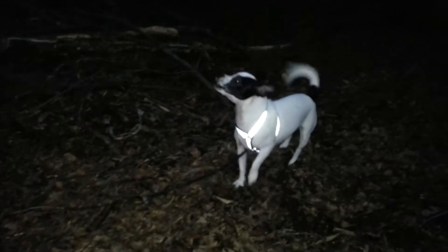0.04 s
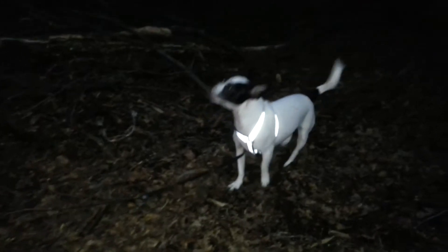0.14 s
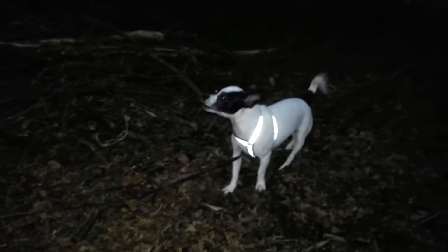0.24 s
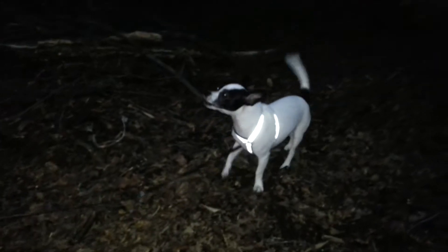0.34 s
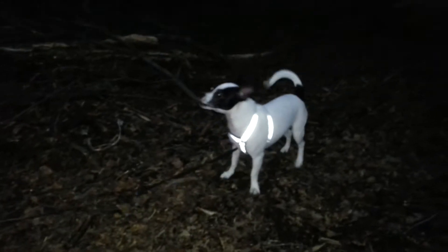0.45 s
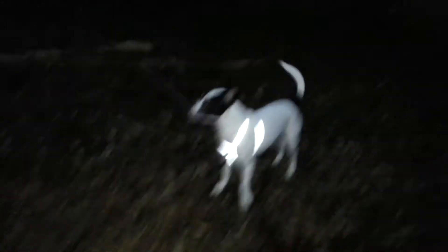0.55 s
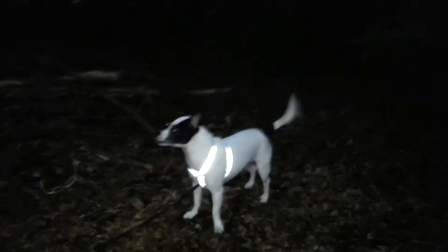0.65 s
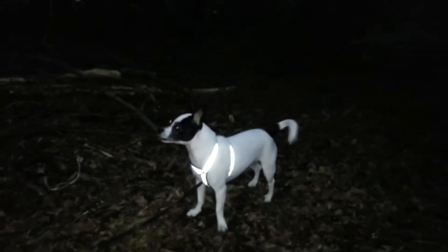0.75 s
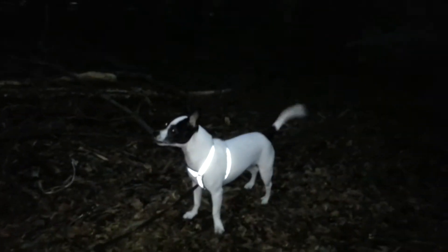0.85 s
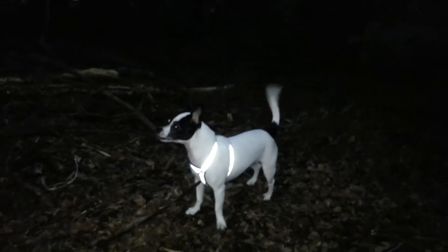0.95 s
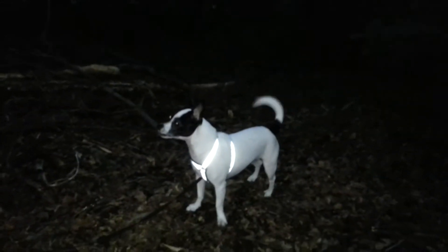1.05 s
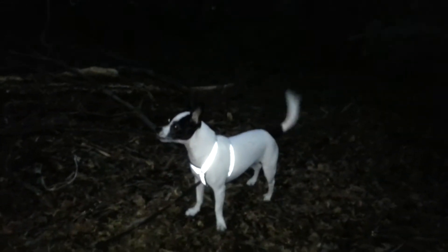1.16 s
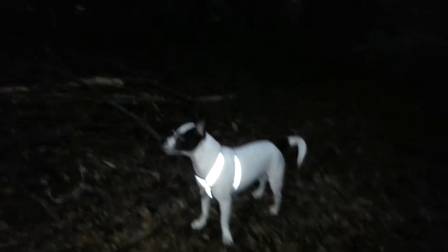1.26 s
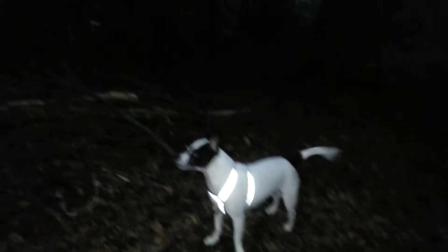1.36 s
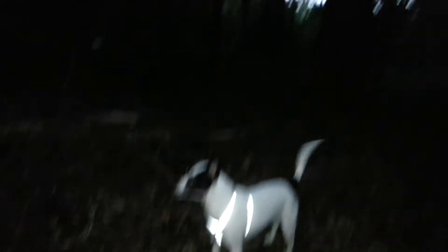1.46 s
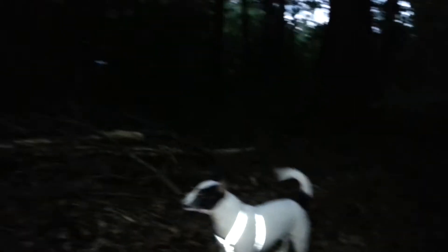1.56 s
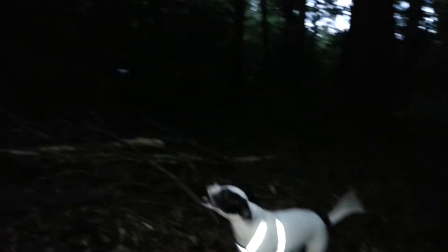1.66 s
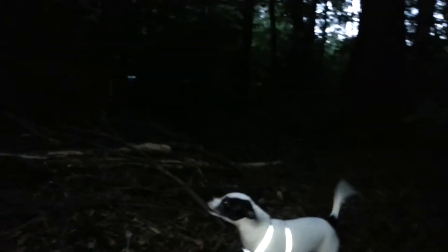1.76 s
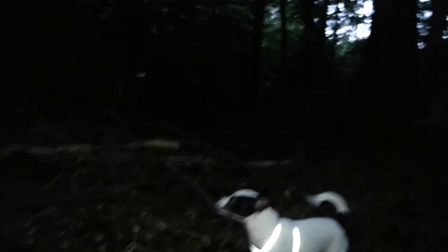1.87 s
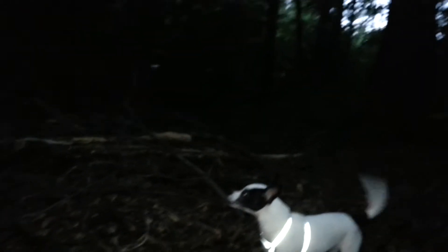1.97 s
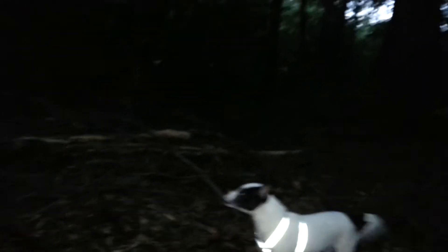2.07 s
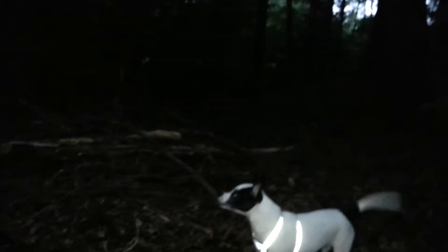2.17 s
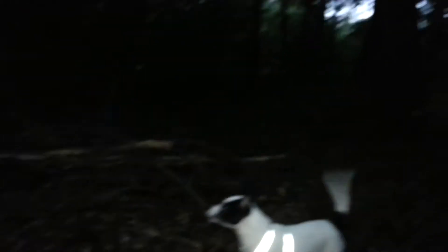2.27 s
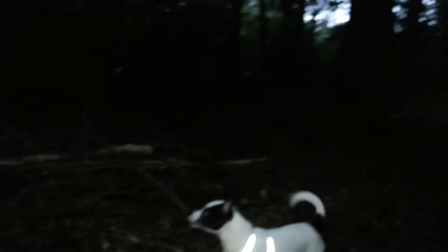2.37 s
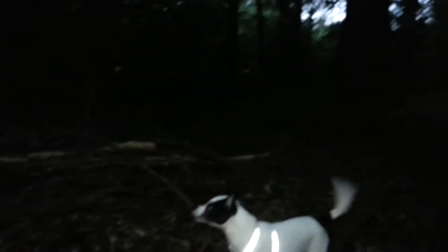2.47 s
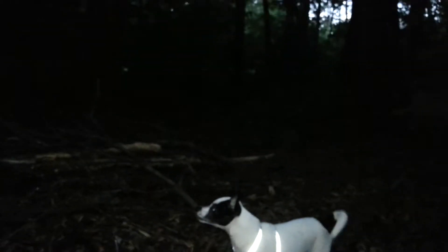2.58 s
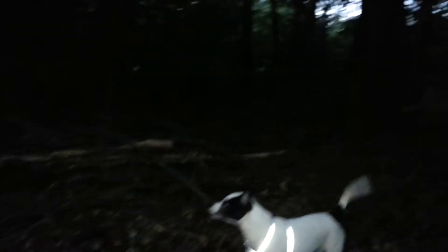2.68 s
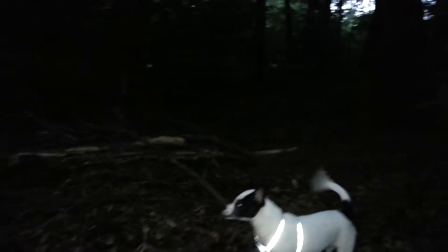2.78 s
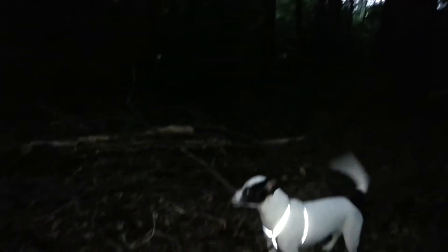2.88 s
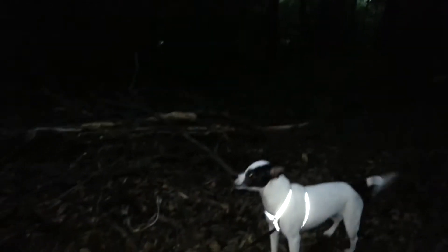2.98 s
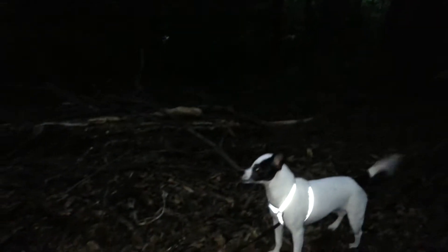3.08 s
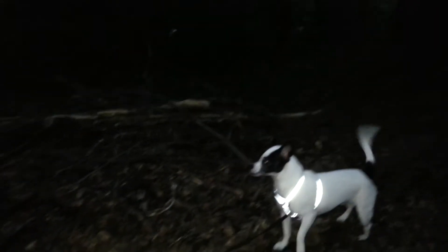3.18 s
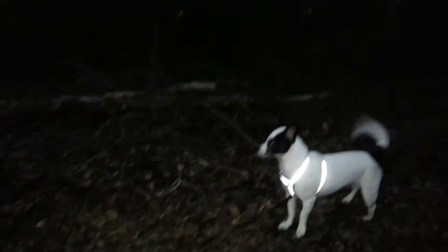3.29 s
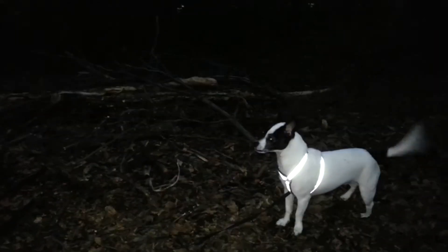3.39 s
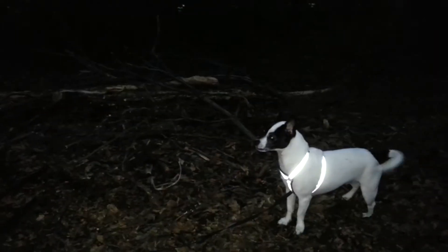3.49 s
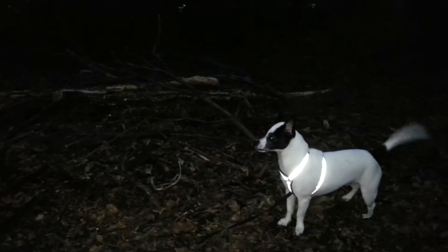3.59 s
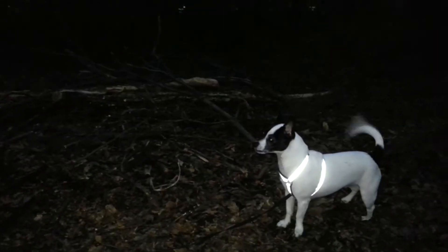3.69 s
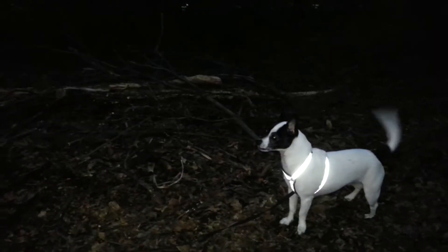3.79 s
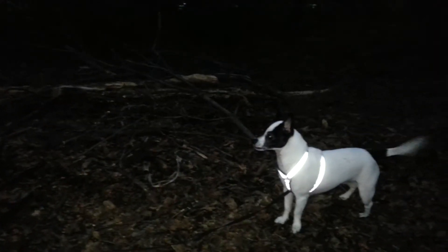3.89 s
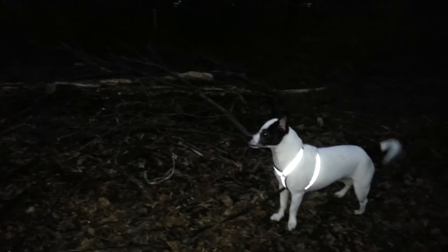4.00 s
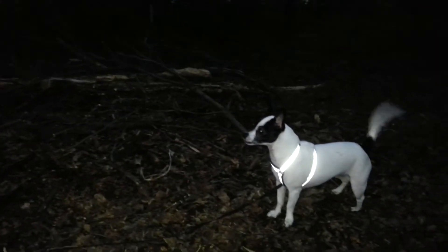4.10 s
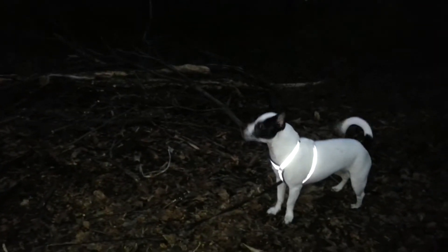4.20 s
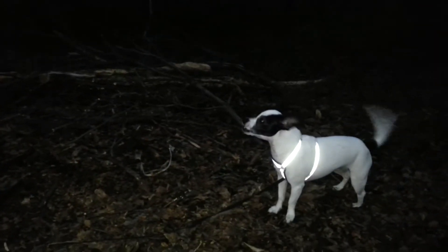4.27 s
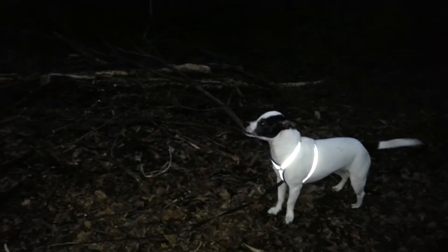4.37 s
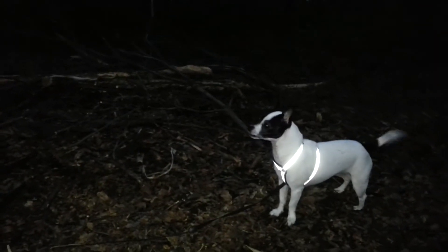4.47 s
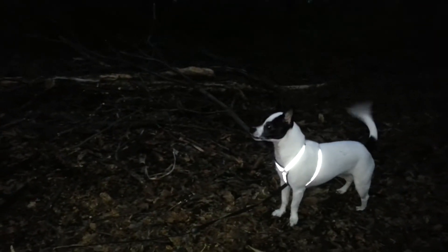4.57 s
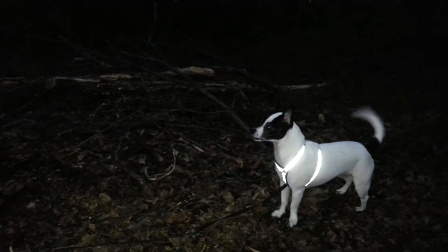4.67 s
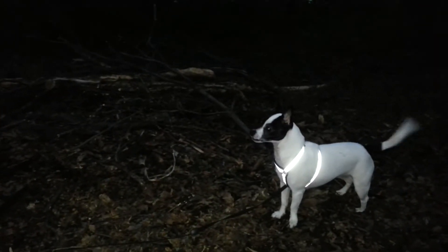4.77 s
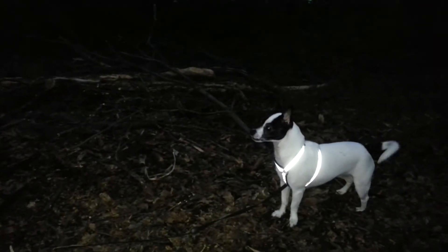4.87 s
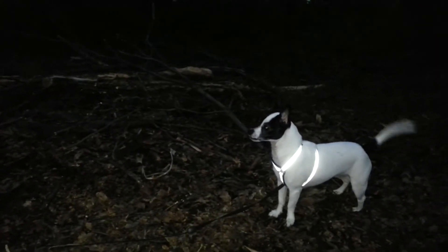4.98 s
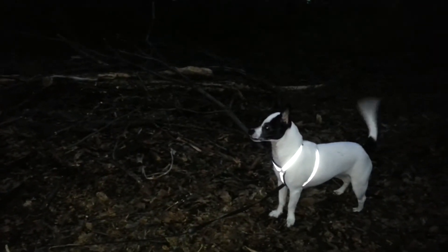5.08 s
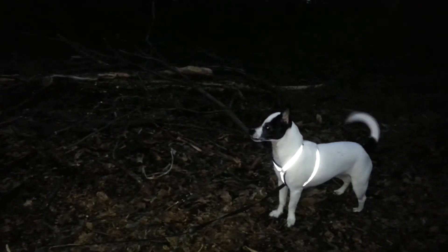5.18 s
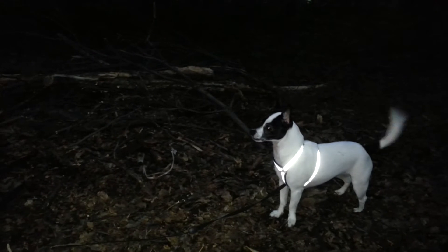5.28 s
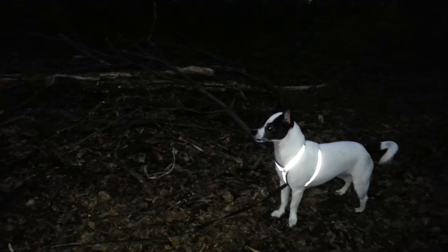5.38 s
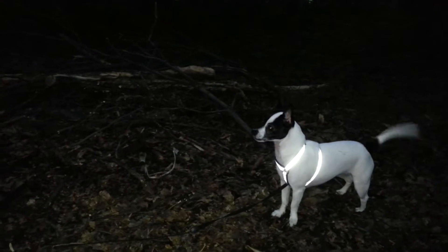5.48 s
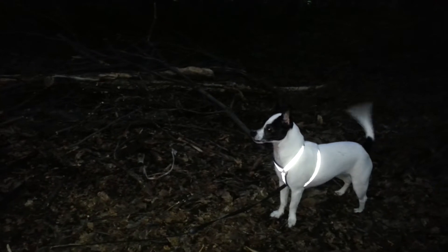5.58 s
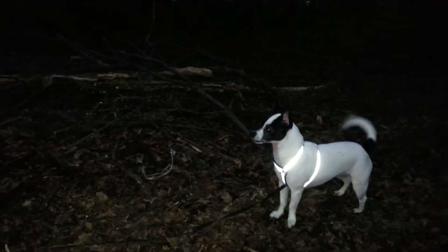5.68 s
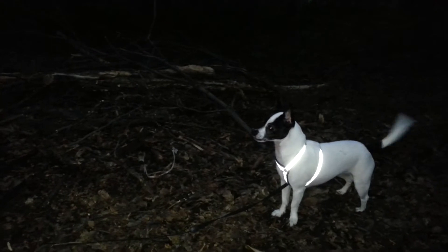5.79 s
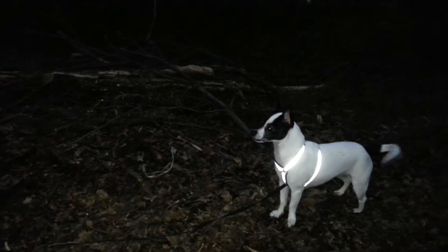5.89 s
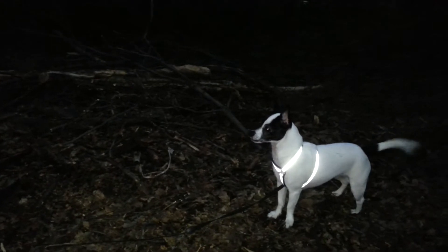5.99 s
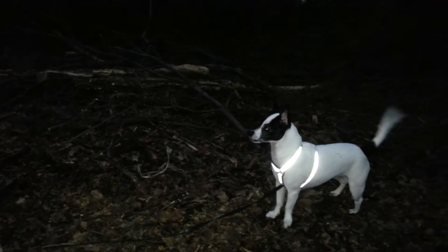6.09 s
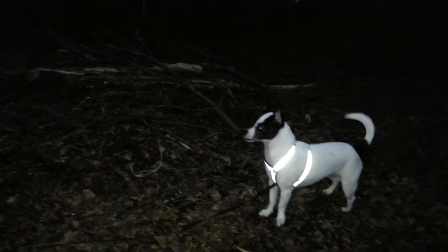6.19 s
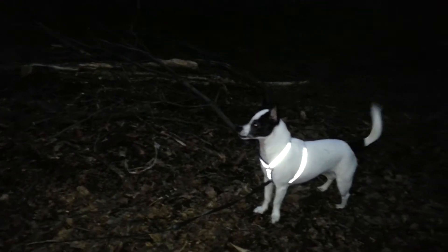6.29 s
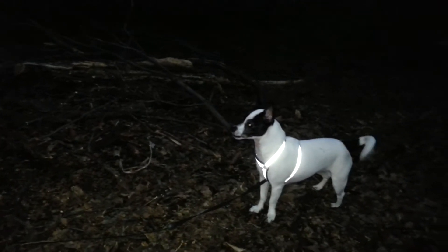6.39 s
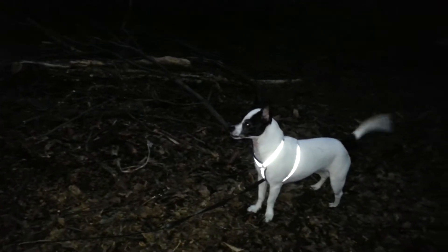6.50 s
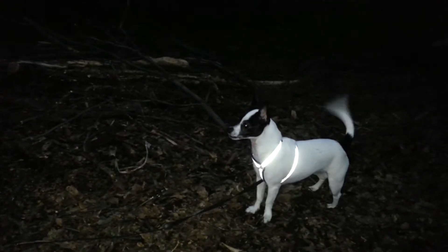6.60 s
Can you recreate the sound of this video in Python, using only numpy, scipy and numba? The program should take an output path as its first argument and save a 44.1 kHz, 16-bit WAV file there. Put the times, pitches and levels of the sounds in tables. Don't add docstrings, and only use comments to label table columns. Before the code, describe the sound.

Throbbing growl, low woof, loud overloaded bark, then woof and bark again from a nearby small dog; drops tick on leaves, far dog yelps faintly.

```python
import sys
import numpy as np
from scipy import signal
from scipy.fft import rfft, irfft, next_fast_len
from scipy.io import wavfile
from scipy.ndimage import uniform_filter1d, map_coordinates
from numba import njit

SR = 44100
rng = np.random.default_rng(int(sys.argv[2]) if len(sys.argv) > 2 else 0)


def volts_from_db(level):
    exponent = np.asarray(level, float) / 20
    return 10 ** exponent


def wrap_up_sound(samples):
    columns = np.atleast_2d(samples).T
    tamed = np.clip(columns, -1, 1)
    steps = np.round(tamed * 32767).astype(np.int16)
    wavfile.write(sys.argv[1], SR, steps)


N = 293265


def unit(x):
    return x / np.sqrt(np.mean(x ** 2) + 1e-20)


def along(points, hz):
    f, v = np.transpose(points)
    return np.interp(np.log(hz + 1), np.log(f + 1), v)


def span(rows):
    s, *cols = np.transpose(rows)
    start = round(s[0] * SR)
    t = np.arange(start, min(round(s[-1] * SR), N)) / SR
    return start, [np.interp(t, s, c) for c in cols]


def wobble(size, rate):
    knots = rng.standard_normal(int(size * rate / SR) + 4)
    return map_coordinates(knots, [np.arange(size) * rate / SR])


def filtered(x, response):
    m = next_fast_len(N + SR // 2)
    return irfft(rfft(x, m) * response(np.fft.rfftfreq(m, 1 / SR)), m)[..., :N]


def band(hz, low_hz, high_hz):
    up, down = 1j * hz / low_hz, 1j * hz / high_hz
    return up ** 2 / (1 + np.sqrt(2) * up + up ** 2) / (1 + np.sqrt(2) * down + down ** 2)


@njit
def resonate(x, turn, radius):
    y = np.zeros(len(x))
    for n in range(2, len(x)):
        push = (1 - radius ** 2) / 2 * (x[n] - x[n - 2])
        y[n] = push + 2 * radius * np.cos(turn[n]) * y[n - 1] - radius ** 2 * y[n - 2]
    return y


def throat(x, modes, stretch, bright_db=0, tongue=None):
    out = 0
    for k, (hz, width, db) in enumerate(modes):
        if tongue is not None and 1440 < hz < 2050:
            shift = tongue
        else:
            shift = stretch ** (1 if hz < 1000 else 1 / 2 if hz < 2050 else 1 / 4)
        turn, radius = 2 * np.pi * hz * shift / SR, np.exp(-np.pi * width / SR)
        twice = resonate(resonate(x, turn, radius), turn, radius)
        level = volts_from_db(db + bright_db * np.clip(hz / 1200 - .75, 0, 1))
        out = out + (-1) ** k * level * twice
    return out


# resonances (centre in Hz, width in Hz, level in dB),
# then the level of the breath hiss under the voice in dB.
MOUTHS = [
    ([(211, 81, -12.5), (417, 170, -16.5), (700, 160, 5), (1150, 240, -10), (1913, 180, -9.5)], -44.5),
    ([(839, 250, 9), (1550, 360, 2), (2274, 200, 0.5), (3600, 5100, -23)], -38.5),
    ([(246.9, 96, -16.5), (750, 260, -5.5), (1376, 180, -7), (1898, 210, -11)], -29),
    ([(742, 210, 7), (1521, 300, 0.9), (2193, 230, -5), (3700, 1400, -27), (3980, 600, -25.5)], -32.5),
]
# time in seconds, pitch in Hz, effort in dB, mouth stretch as a factor,
# tongue shift of the middle resonance as a factor.
WOOF_1 = [(.364, 214.6, -36.5, 0.84, 1.3), (.371, 217.3, -20.5, 1.05, 0.77), (.383, 211.1, -16, 0.89, 0.87),
          (.388, 186.2, -11, 1.11, 1.02), (.397, 186, -21.5, 0.93, 1.02), (.436, 170.3, -19, 1.06, 0.9),
          (.45, 173, -31, 1.1, 0.99)]
BARK_1 = [(1.598, 281, -36.5, 0.31, 0.97), (1.603, 285.6, -10, 0.83, 1.02), (1.62, 336.5, -1, 0.88, 1.01),
          (1.642, 379, 2, 0.94, 1.18), (1.645, 488.2, -1, 1.06, 1.08), (1.69, 448.1, -3, 1.03, .98),
          (1.758, 409, -9.5, .95, 1.03), (1.766, 330.7, -18.5, 1.03, 1.01),
          (1.792, 244.6, -24.5, 0.9, 0.92), (1.828, 165.6, -51, 1, .99)]
WOOF_2 = [(2.953, 211, -36.5, 0.75, 0.67), (2.958, 216.4, -22.5, .84, 0.96),
          (2.969, 211.5, -18, 0.97, 0.86), (2.99, 206.4, -16, .82, 1), (3.002, 247.6, -11.5, .94, 0.83),
          (3.008, 242, -18.5, 1.0, 1.11), (3.035, 252, -23, 1, 1.21), (3.058, 224.3, -33.5, 1.2, 1.06),
          (3.085, 209.3, -75, 0.83, 1.2)]
BARK_2 = [(4.207, 199.9, -29.5, .87, 1.03), (4.224, 246.6, -18.5, .88, 0.98),
          (4.233, 305.8, -10, .86, 1.07), (4.243, 317.6, 0.5, .88, .95), (4.27, 350.5, -0.5, .96, 1.01),
          (4.296, 376.3, -3, 1.02, 1.0), (4.329, 389.4, -15, 1, .99), (4.34, 264.2, -27.5, 1.01, 0.76),
          (4.368, 207.6, -45, 0.87, 1), (4.4, 173.3, -52.5, .9, 1.2)]
# clear until this time in seconds, roughness after it (0 to 1),
# chest tone in dB, stutter start in seconds, stutter speed in Hz.
BREAKS = [
    (.375, .3, -42, .4, 40),
    (1.638, .27, -41, 1.698, 54),
    (2.96, .27, -42, 3.01, 60),
    (4.252, .42, -41, 4.306, 82),
]


def barks():
    clear, crack_s = 0.099, .02
    stutter_db, stutter_grows_s = 7, 0.06
    breath_level = 9.1
    chest_follows, chest_fade_s = 0.089, 0.023
    open_bright_db, rough_bright_db = 23, 17.5
    out, hiss = np.zeros(N), np.zeros(N)
    calls = WOOF_1, BARK_1, WOOF_2, BARK_2
    for rows, (mouth, hiss_db), how_it_breaks in zip(calls, MOUTHS, BREAKS):
        clear_s, harsh, chest_db, stutter_s, stutter_hz = how_it_breaks
        start, (pitch_hz, db, stretch, tongue) = span(rows)
        size = len(db)
        t = (start + np.arange(size)) / SR
        rough = np.clip(clear + (harsh - clear) * np.clip((t - clear_s) / crack_s, 0, 1), 0, 1)
        rough = rough * np.clip((db - db.max() + 22) / 10, .25, 1)
        late = np.clip(t - stutter_s, 0, 1)
        fade = np.clip(np.minimum(t - t[0], t[-1] - t) / chest_fade_s, 0, 1)
        chest = volts_from_db(chest_db + chest_follows * db) * fade
        dips = np.sin(np.pi * stutter_hz * late) ** 4
        db = db - stutter_db * np.clip(late / stutter_grows_s, 0, 1) * dips
        steady_db = uniform_filter1d(db, size=SR // 40)

        cycles = np.cumsum(pitch_hz * (1 + 0.22 * rough * wobble(size, 250))) / SR
        beat = np.cos(np.pi * cycles)
        pulses = beat ** 60 * volts_from_db(rough * (11 * wobble(size, 300) + 3 * wobble(size, 70)))
        breath = unit(beat ** 4 * rng.standard_normal(size))
        source = unit(np.gradient(pulses)) + breath_level * rough * breath
        bright_db = 0.64 * (steady_db - steady_db.max())
        bright_db = bright_db + open_bright_db * (stretch.clip(0, 1.1) - 1)
        bright_db = bright_db + rough_bright_db * (rough - clear) * np.exp(-late * stutter_hz / 3)
        voice = throat(source, mouth, stretch, bright_db, tongue)
        power = np.abs(uniform_filter1d(voice ** 2, size=SR // 70))
        voice = volts_from_db(db) * voice / np.sqrt(power + 1e-12)
        out[start:start + size] += voice + np.sqrt(2) * chest * np.sin(2 * np.pi * cycles)
        spill_db = .5 * db + hiss_db + np.linspace(-12, 9, size) + 5.5 * wobble(size, 83)
        hiss[start:start + size] += volts_from_db(spill_db) * rng.standard_normal(size)
    return out + filtered(hiss, lambda hz: band(hz, 4200, 13000))


# centre in Hz, width in Hz, level in dB.
SHUT = [(196, 150, -5.5), (428, 190, 1.5), (864, 320, 3.5), (1087, 140, 1.5)]
AJAR = [(197.8, 36, -27.5), (522, 250, -10), (738, 93, 4), (1934, 110, -17.5)]
# centre in Hz, width in Hz, level in dB.
CHEEK = [(1065, 160, -7.5)]
# time in seconds, fold slaps in Hz, effort in dB, mouth stretch as a factor.
GROWL = [(0, 190, -26, 1.12), (0.049, 175, -12, 1.06), (.13, 160, -15.5, .99), (.27, 165, -19, .95),
         (.31, 167, -16.5, 0.97), (.345, 182, -9, 0.92), (.455, 153, -21.5, 1.04), (.7, 141, -27.5, 1.02),
         (.9, 138, -29, 1.01), (1.399, 132, -31.5, .98), (1.51, 135, -34.5, .97), (3.23, 95, -41, .99),
         (3.34, 116, -35.5, .98), (3.42, 100, -39, .98), (3.5, 115, -37.5, .97), (3.74, 115, -39, .96),
         (3.92, 116, -30.5, .93), (4.12, 120, -34.5, .9)]
# first slap in seconds, length in seconds (0 is a lone slap), level of the last slap in dB.
SNARL = [(0, .005, 0), (.031, .0116, 4.5), (.067, .0115, 1.5), (.1, .0115, -6), (.137, 0.013, -4.5),
         (.1713, 0.011, -5), (.2085, .013, -10.5), (.2427, .006, -1), (.277, .0064, -7.5),
         (.3087, .0056, 0), (.3406, 0.01, 1)]
RUMBLE = [(.4568, .0256, -3), (.5028, .0202, -2), (.5454, .0208, -4), (.5915, .0139, 1), (.6327, .0216, -5),
          (.6774, .0139, 1), (.702, 0, -13), (.7207, .0139, 0), (.746, 0, -10), (.7592, .0218, -6),
          (.8031, .0145, -1), (.8305, 0, -9), (.8388, .0222, -6), (.8857, .0144, -1), (.9173, .0215, 1),
          (.9696, .0139, 0), (.994, 0, -9), (1.0038, .0221, -3), (1.0401, .0292, -3), (1.0903, .0221, -5),
          (1.1283, .0215, 1), (1.1624, 0, -9), (1.1753, .0221, -6), (1.2215, .0145, -1), (1.2597, .023, -4),
          (1.2974, .022, 0), (1.3357, 0, -7), (1.3436, .0226, -6), (1.3916, .0151, -6), (1.4261, .015, -2),
          (1.4717, .0071, -1), (1.5075, .0075, -1)]
MUTTER = [(3.1547, 0, -2), (3.166, 0, -2), (3.1923, 0, -1), (3.2072, 0, -1), (3.2213, 0, 0),
          (3.2331, .0421, -1), (3.3048, .0185, 0), (3.3462, .0176, 1), (3.3978, .0402, -4), (3.4776, 0, 2),
          (3.5046, .0518, -2), (3.567, .0621, 0), (3.64, .06, -2), (3.7194, .034, 0), (3.7783, .0165, -6),
          (3.8168, .0175, 0), (3.852, .0165, 0), (3.8944, .0185, -5), (3.933, .008, 0), (3.9777, 0, 0),
          (4.0126, 0, 0), (4.0486, 0, 0), (4.0831, 0, 0), (4.1177, 0, 0)]


def growl():
    parted, closed = 0.87, 0.068
    gulp, gulp_s, gulp_dull_db = [(360, 220, 4.8)], 3.96, -5.5
    shut, ajar = np.zeros(N), np.zeros(N)
    s, slaps_hz, effort_db, jaw = np.transpose(GROWL)
    for throbs, opening in (SNARL, parted), (RUMBLE + MUTTER, closed):
        for first, length, last_db in throbs:
            count = round(length * np.interp(first, s, slaps_hz)) + 1
            size_db = np.interp(first, s, effort_db) + rng.normal(0, .7, count)
            size_db[0] -= 2.4 * (count > 2)
            size_db[-1] += last_db
            slap_s = np.linspace(first, first + length, count) - .0012
            slap_s = slap_s + rng.normal(0, 1, count) / 12000
            at = np.round(slap_s * SR).clip(0).astype(int)
            shut[at] += (opening - 1) * volts_from_db(size_db + 32.0)
            ajar[at] += -opening * volts_from_db(size_db + 36.5)
    t = np.arange(N) / SR
    jaw = np.interp(t, s, jaw)
    late = t > gulp_s
    behind_lips = throat(shut * volts_from_db(gulp_dull_db * late), SHUT, jaw) + throat(shut * late, gulp, jaw)
    muffled = filtered(behind_lips, lambda hz: band(hz, 120, 1100))
    return muffled + throat(ajar, AJAR, jaw) - throat(ajar, CHEEK, jaw ** -2)


# frequency in Hz, left over right in dB.
LEFT_LIFT = [(900, 0.5), (1600, 9), (5000, 0.5), (12000, 1)]


def place_left(dog):
    def sides(hz):
        level = volts_from_db(along(LEFT_LIFT, hz) * np.array([[.5], [-.5]]))
        return level * np.exp(1j * np.pi * hz * np.array([[1.5], [-1.5]]) / SR)
    return filtered(dog, sides)


# start in seconds, length in seconds, top pitch in Hz, level in dB,
# overtones over the first partial in dB.
YELPS = [
    (3.625, 0.18, 560, -39.5, -10.5),
    (6.272, .135, 560, -42, -4),
]
SQUEALS = [
    (3.43, 0.15, 609, -66, 7.5),
    (3.565, 0.1, 604, -69, 5),
    (3.68, 0.065, 605, -69.5, 6),
]
WHINES = [
    (3.61, 0.081, 493.3, -58.5, 13),
    (5.4, 0.17, 450, -54.5, -26.5),
    (5.69, 0.122, 600, -51.5, -1.5),
    (5.7, 0.15, 550, -65.5, 8),
]
MOANS = [
    (6.52, 0.11, 558.3, -50.5, 1.93),
]


def far_dog():
    scoop_share, break_share, sag = 0.21, 0.046, 0.036
    swell_depth_db, peak = 17.5, 0.59
    held_back = .4
    # starts flat by this share, overtones lead the onset in dB, loss a partial in dB
    kinds = (YELPS, (0.28, 10, 13)), (SQUEALS, (.04, 2.5, -5)), (WHINES, (.05, 11, 8.9)), (MOANS, (.05, 6, 24))
    out = np.zeros(N + SR)
    for calls, (scoop, nasal_db, tilt_db) in kinds:
        for s, length, top_hz, db, upper_db in calls:
            start, size = round(s * SR), round(length * SR)
            u = np.linspace(0, 1, size)
            flat = 1 / (1 + np.exp((u - scoop_share) / break_share))
            pitch_hz = top_hz * (1 - scoop * flat - sag * u ** 4)
            from_peak = np.where(u < peak, 1 - u / peak, (u - peak) / (1 - peak))
            swell_db = db - swell_depth_db * from_peak ** 2
            phase = 2 * np.pi * np.cumsum(pitch_hz * (1 + .018 * wobble(size, 77))) / SR
            partials_db = [
                -held_back * nasal_db * flat,
                upper_db + nasal_db * flat,
                upper_db + nasal_db * flat - tilt_db,
                upper_db - tilt_db ** 2 / 4 - 9.0,
            ]
            for k, partial_db in enumerate(partials_db):
                level = volts_from_db(swell_db + partial_db + 4.5 * wobble(size, 90))
                out[start:start + size] += level * np.sin((k + 1) * phase + .7 * wobble(size, 70))
    return out[:N]


# frequency in Hz, time to fall 60 dB in seconds.
WOODS = [(200, 0.2), (900, 1.2), (2500, 0.7), (4000, .5), (5200, 0.22), (12000, 0.2)]


def woods(x, delay):
    hz, t, z = signal.stft(rng.standard_normal((2, 3 * SR // 2)), SR, nperseg=256)
    z[1] = np.where(hz[:, None] < 900, 0.32 * z[0] + 2.1 * z[1], z[1])
    tail = signal.istft(z * volts_from_db(-60 * t / along(WOODS, hz)[:, None]), SR, nperseg=256)[1]
    late = np.pad(x, (round(delay * SR), 0))[None]
    return signal.fftconvolve(late, tail / np.linalg.norm(tail[0]), axes=1)[:, :N]


# from this time in seconds, level in dB,
# delay of the first return in seconds.
RETURNS = [
    (0, -29, 0.06),
    (1.551, -18.5, 0.028),
    (2.5, -31.5, .04),
    (4.18, -25, 0.014),
]
# frequency in Hz, level in dB.
TRUNKS = [(700, -2.5), (900, -5), (1130, 10), (1450, -0.6), (1850, -0.5), (2300, 0.5), (2800, 7),
          (4000, 3.5)]
FAR_TRUNKS = [(560, -4), (1100, 4.5), (1800, 1.5)]


def echoes(dog, far):
    thin = filtered(dog, lambda hz: band(hz, 1390, 12000) * volts_from_db(along(TRUNKS, hz)))
    turn = np.searchsorted([s for s, _, _ in RETURNS], np.arange(N) / SR, "right") - 1
    far_back = filtered(far, lambda hz: volts_from_db(along(FAR_TRUNKS, hz)))
    out = volts_from_db(-9.0) * woods(far_back, 0.031)
    for k, (_, db, delay) in enumerate(RETURNS):
        out = out + volts_from_db(db) * woods(thin * (turn == k), delay)
    return out


# time in seconds, peak in dB, low part over the peak in dB,
# left over right in dB.
DROPS = [(.118, -30, -6, -5), (0.4681, -31, -28, 2), (0.5317, -18, -58, 10.5), (0.615, -29.5, -45, -1.5),
         (1.22, -33, 0, 1.7), (1.3177, -24.5, -32, -2.2), (1.927, -28, -3.5, -2), (2.9228, -34.5, -8, -5),
         (3.1705, -19.5, -8, -0.1), (3.215, -26.5, -9, 0), (3.3275, -29.5, -9, 0), (3.501, -32, -13, -1.5),
         (3.5338, -34, -19, -4), (3.6183, -33, -37, 0.5), (4.3582, -36, 17.5, -1.5),
         (4.875, -27, -12.5, 1.5), (4.958, -25, -37.5, 0.5), (5.4803, -35.5, -9, -3.5),
         (5.6062, -17, -10, -1.5), (5.6107, -24, -5.5, 1), (5.67, -31.5, -40, 3.5), (5.7585, -24.5, -5, -1),
         (5.802, -38, 12, 2), (5.99, -50, 15.5, 2), (5.9497, -27.5, -10.5, -9), (6.128, -28, -21.5, -3.5),
         (6.2158, -0.5, -7.5, -1), (6.5317, -37, -14.5, -4.5)]
# time in seconds, peak in
# dB.
DRIPS = [(0.524, -34.5), (0.75, -35), (1.2823, -35.5), (1.449, -38.5), (2.169, -40.5), (2.2014, -37.5),
         (2.4639, -39.5), (2.6795, -43), (5.59, -41.5)]
SPOTS = [(0.1052, -31.5), (0.1392, -38.5), (0.3944, -31), (0.4461, -32.5), (0.7178, -37), (0.7829, -42),
         (1.2094, -39), (1.9597, -44), (2.0161, -44.5), (3.587, -44.5), (3.654, -43), (4.4232, -42.5),
         (4.5176, -42.5), (4.7262, -45.5), (4.8525, -37.5), (5.2694, -50.5), (5.3287, -45.5), (5.876, -40)]
# centre in Hz, width in Hz, level in dB.
TICK = [(450, 410, -2), (2290, 1200, 0.5), (4170, 2000, -4), (9700, 4600, -6.5)]


def drops():
    high, low = np.zeros((2, N + SR)), np.zeros((2, N + SR))
    t = np.arange(SR // 5) / SR
    drips = [(s, db, -10.5, -2.5) for s, db in DRIPS]
    spots = [(s - .0006, db, -8, 0) for s, db in SPOTS]
    for s, db, low_db, pan_db in DROPS + drips + spots:
        grit = rng.standard_normal((3, len(t)))
        grit[0, :2] = 2, -1
        rattle = 0.39 * volts_from_db(-60 * t / 0.011) + 0.012 * volts_from_db(-60 * t / 0.41)
        tick = grit[0] * volts_from_db(-60 * t / 0.001) + grit[1:] * rattle
        tick = tick * volts_from_db(db + 10.0 + pan_db * np.array([[.5], [-.5]]))
        start = round(s * SR)
        high[:, start:start + len(t)] += tick
        low[:, start:start + len(t)] += tick * volts_from_db(low_db + 1.0)

    def colour(hz):
        lag = np.exp(-2j * np.pi * hz * np.array([[77], [60]]) / SR)
        return lag * sum(volts_from_db(db) * 1j * hz * w / (c * c - hz * hz + 1j * hz * w) for c, w, db in TICK)

    crisp = filtered(high[:, :N], lambda hz: colour(hz) * band(hz, 2000, 12000))
    return crisp + filtered(low[:, :N], lambda hz: colour(hz) * band(hz, 300, 4600) ** 2)


# frequency in Hz, level per Hz in dB.
PATTER = [(25, -30), (70, -27), (115, -7.5), (170, -13), (420, -6), (900, -6.5), (1700, -16), (2350, -13),
          (3600, -19), (5400, -21.5), (14500, -26.5), (14700, -76)]
# time in seconds,
# level in dB.
PATTER_DB = [(0, -49.5), (.5, -54), (0.901, -56.5), (1.6, -59.5), (1.8, -54.5), (2.4, -60.5), (2.93, -62.5),
             (3.048, -54), (3.399, -59), (6.2, -62.5), (6.229, -63.5), (6.5, -59)]
# frequency in Hz, likeness from -1 to 1.
ALIKE = [(60, 0.55), (180, 0.66), (550, 0.42), (1650, -0.066), (4970, -0.2), (15000, -0.26)]


def patter():
    z = signal.stft(rng.standard_normal((2, N)), nperseg=512)[2]
    patches = uniform_filter1d(rng.standard_normal(z.shape[1:]), 6, 0)
    patches = unit(uniform_filter1d(patches, 12, 1))
    pair = signal.istft(z * volts_from_db(1.6 * patches), nperseg=512)[1][:, :N]

    def shares(hz):
        turn = np.arccos(np.clip(along(ALIKE, hz), -1, 1)) / 2
        return volts_from_db(along(PATTER, hz)) * np.array([np.cos(turn), np.sin(turn)])

    mid, side = filtered(pair, shares)
    hits = rng.random(N) < 60 / SR
    specks = hits * volts_from_db(18.5 + rng.exponential(size=N).clip(0, 3)) * rng.choice([-1, 1], N)
    specks = filtered(specks, lambda hz: volts_from_db(along(PATTER, hz)) * band(hz, 1300, 16000))
    bed = unit(np.array([np.roll(mid + side + specks, 17), mid - side + specks]))
    s, db = np.transpose(PATTER_DB)
    return volts_from_db(np.interp(np.arange(N) / SR, s, db) + 8.0 + wobble(N, 2.2)) * bed


def insects():
    centre_hz, width_hz, level_db = 4770, 260, -59
    noise = rng.standard_normal((2, N))
    hiss = filtered(noise, lambda hz: np.exp(-((hz - centre_hz) / width_hz) ** 2 / 2))
    return volts_from_db(level_db + .7 * wobble(N, 12)) * unit(hiss)


def scene():
    dog, far = barks() + growl(), far_dog()
    return place_left(dog) + far + echoes(dog, far) + drops() + patter() + insects()


def top_cut(x):
    return signal.sosfilt(signal.butter(12, 15750, fs=SR, output="sos"), x)


def record(dry):
    top, drift, drift_hz, coupling_hz = 1.02, .3, 40, 120
    heard = filtered(dry, lambda hz: 1 / (1 + (hz / 14900) ** 24))
    over = np.clip(uniform_filter1d(np.abs(heard), size=SR // 150) - .45, 0, 1)
    bent = heard / (1 + np.abs(heard / top) ** 12) ** (1 / 12)
    bent = bent - filtered(bent - heard, lambda hz: 1 / (1 + (hz / coupling_hz) ** 4))
    mix = bent + drift * filtered(over, lambda hz: band(hz, 22, drift_hz))
    return top_cut(mix)


dry = scene()
out = record(dry)
wrap_up_sound(out)
```